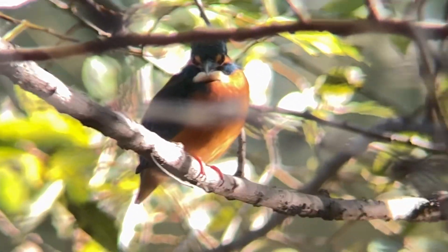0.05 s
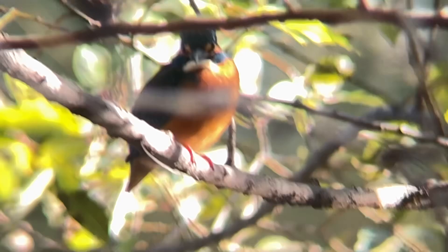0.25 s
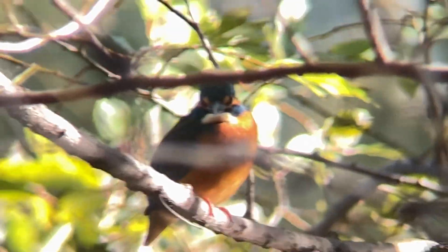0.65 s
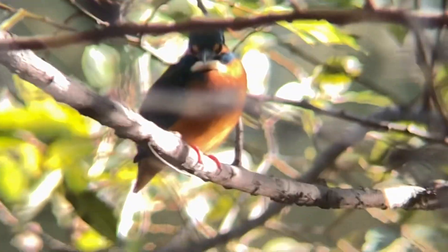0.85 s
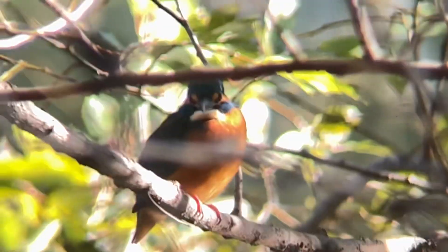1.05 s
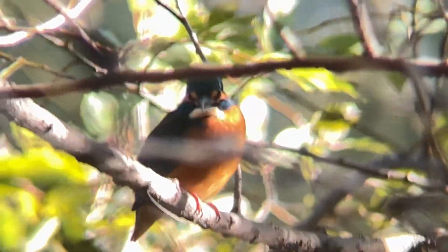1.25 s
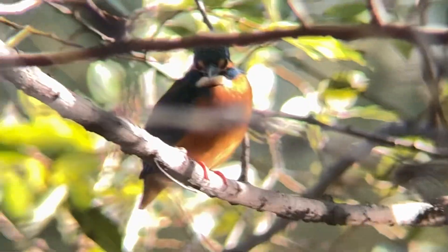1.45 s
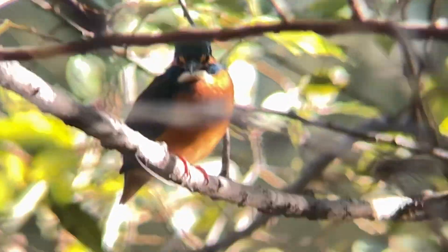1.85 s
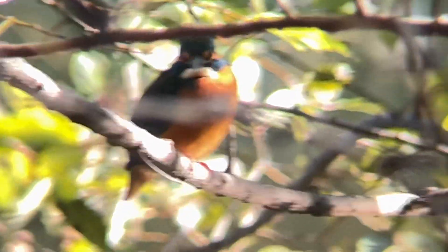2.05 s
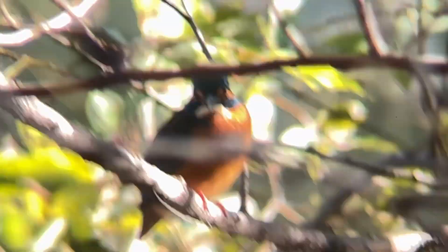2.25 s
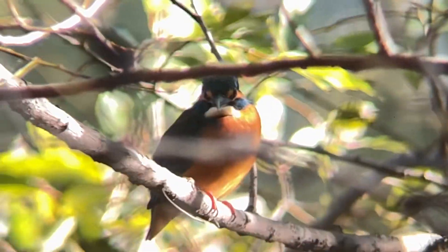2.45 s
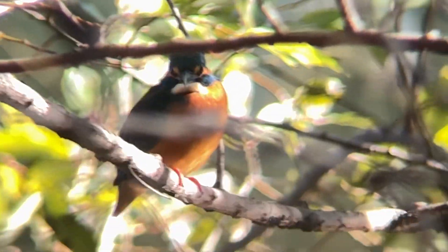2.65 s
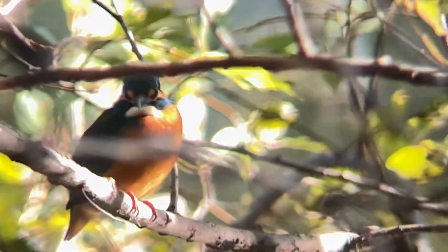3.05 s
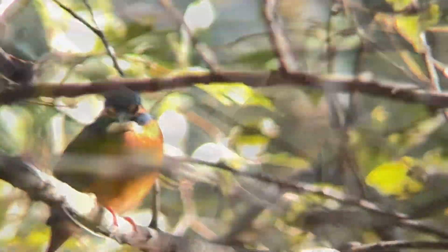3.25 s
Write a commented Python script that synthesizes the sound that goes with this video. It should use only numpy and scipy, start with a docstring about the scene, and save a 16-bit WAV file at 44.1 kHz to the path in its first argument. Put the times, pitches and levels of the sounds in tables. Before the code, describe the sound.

Short, high bird chirps echo lightly through trees over a faint park rumble.

```python
"""A small bird chirps among trees: each note whips up, climbs and drops away, some with a second voice.
Its syrinx sings a wavering whistle, edged with rough harmonics and rasp; fainter whistles sit farther off.
Trunks and leaves scatter the notes into a long tail. Close by come a few soft rustles and the sharp tick
of one tiny hard contact. A low park rumble lies beneath it all."""
import sys
import numpy as np
from scipy import signal
from scipy.fft import rfft, irfft
from scipy.io import wavfile
from scipy.ndimage import uniform_filter1d

SR = 44100
rng = np.random.default_rng(int(sys.argv[2]) if len(sys.argv) > 2 else 0)


def persist_wave(psi):
    """Save psi, clipped to +-1, as 16-bit WAV."""
    counts = np.round(np.clip(psi, -1, 1) * 32767).astype(np.int16)
    wavfile.write(sys.argv[1], SR, np.atleast_2d(counts).T)


N = 149940
T = np.arange(N) / SR

# The bird's notes: start/s, whip-up/s, time to the drop/s, knee/Hz, middle/Hz, top/Hz, drop time/s,
# level/dB, swell/dB, then against the whistle: second harmonic/dB, third harmonic/dB, rasp/dB
BIRD_NOTES = [ (0.703, 0.017, 0.091, 3450, 3953, 4280, 0.017, -42, -3.5, -13, -13, -8),
              (1.022, .020, .099, 3450, 4090, 4570, 0.016, -33, 9.5, -23.5, -19, -16.5),
              (1.025, .016, 0.074, 5330, 5970, 6700, .018, -41.5, -19, -25, -23, -8),
              (1.296, .015, .085, 4428, 5440, 6590, 0.009, -29, -1, -19.5, -20.5, -16),
              (1.307, 0.017, 0.089, 3400, 3940, 4570, 0.007, -39, 13.5, -15.5, -22, -33),
              (1.498, .012, 0.082, 4550, 5214, 6330, 0.011, -28, -3, -23, -18, -21),
              (1.69, 0.015, .091, 4110, 4936, 5706, 0.006, -29, 0, -20.5, -10, -16),
              (1.915, .014, 0.11, 4080, 4940, 5510, 0.0074, -31.5, -1, -29.5, -26, -13.5),
              (2.152, .013, .133, 3620, 4450, 4894, .011, -35, 6, -22, -22.5, -15.5),
              (2.406, 0.01, 0.13, 3783, 4565, 4980, 0.025, -37, 1.5, -28, -21, -14),
              (2.696, 0.0099, 0.11, 3822, 4150, 4350, .011, -47.5, -14, -27, -36, -4),
              (2.732, .018, .100, 3400, 3900, 4412, 0.021, -41.5, 8, -18, -22.5, -9),
              (2.994, 0.021, .093, 4120, 4936, 5590, .010, -37.5, -6.5, -14, -14.5, -12)]
# Spectrum of the rasp in the voice: f/Hz, level/dB
RASP_SPECTRUM = [(1200, -11), (1800, -0.5), (2500, -11), (4000, 4), (7000, 0.5), (10000, 0), (13000, -1.5),
                 (15000, 12.5)]
# The throat's filter on the whistle: f/Hz, gain/dB
THROAT_EQ = [(1600, 1), (2500, -6.5), (3500, -0.5), (6000, -0.5)]
# Far notes: start/s, length/s, first pitch/Hz, last pitch/Hz, level/dB, overtones against the whistle/dB
FAR_NOTES = [(0.0, 0.09, 4150, 4064, -54, -17), (.35, 0.09, 4250, 4340, -65, -33),
             (0.442, 0.067, 3614, 3610, -58.5, -8.5), (2.442, 0.057, 3690, 3550, -49.5, -40),
             (2.86, 0.08, 4345, 4140, -46, -13), (3.184, .09, 3504, 3940, -57, -34)]
# Echoes off trunks: delay/s, gain/dB
TRUNK_ECHOES = [(.0042, -12), (.0075, -10.5), (0.0135, -16.5), (0.022, -13.5), (.029, -37)]
# Far echoes lose a little top: f/Hz, gain/dB
TAIL_EQ = [(6000, -0.5), (9000, -3.5), (13000, -1)]
# The microphone's colour: f/Hz, gain/dB
MIC_EQ = [(1000, -4.5), (5500, -2), (6600, -2), (7200, 3), (7800, -5), (8600, -3), (10000, -7), (11300, 0),
          (12300, -15.5), (13300, -9), (14500, -27), (16000, -49)]
# Phase between the microphone's two ports: f/Hz, phase/rad
PORT_PHASE = [(100, 0), (1400, 1.3), (2000, 1.2), (4000, -0.64), (5500, -0.11), (6400, 1.4), (6900, -0.5),
              (7500, -3.5), (8200, -2.5), (10700, -6.5), (12700, -5.5), (13500, -8), (14500, -10),
              (16000, -34)]
# Ringing modes of the tick: f/Hz, level/dB, t60/s
TICK_RING = [(920, -40, .008), (3150, -27, .004), (4760, -17, .0025), (8100, -19, .002), (9950, -8, .0026),
             (11400, -13, .002), (13600, -4, .0013), (15000, -3, .0016)]
# The tick is too small to radiate lows: f/Hz, gain/dB
TICK_EQ = [(150, -16), (900, -5), (2200, -12), (3100, -3), (6500, -4), (8000, -3), (10000, 1), (15000, 2),
           (16500, -10)]
# Rustle cues: t/s, decay/s, level/dB
RUSTLE_CUES = [(0.095, 0.038, -51.5), (.86, 0.025, -60), (2.675, 0.0075, -51.5), (2.925, 0.0075, -49.5),
               (3.262, 0.0063, -65)]
# Spectrum of a rustle: f/Hz, level/dB
RUSTLE_SPECTRUM = [(500, -3), (1200, -6), (1650, 2.5), (2300, -20), (4000, -5), (6200, -6.5), (8000, -20.5),
                   (11000, -10), (14000, -37)]
# Spectrum of the park bed: f/Hz, level/dB
PARK_SPECTRUM = [(18, -36), (27, -28), (38, -10), (50, -2.5), (61, 1.5), (75, -2), (100, -6.5), (140, -9),
                 (250, -17), (420, -28.5), (700, -30.5), (960, -34), (1150, -37.5), (1700, -35.5),
                 (2500, -41.5), (3500, -35.5), (4300, -32), (5200, -39.5), (6900, -42.5), (7700, -86),
                 (8700, -56.5), (11000, -53.5), (14500, -60), (16000, -86)]
# Stereo width of the bed: f/Hz, side against mid/dB
PARK_WIDTH = [(30, -44), (80, -27), (170, -13.5), (350, -6), (700, -0.5), (1400, -2.5), (3000, -27.5),
              (5000, -38), (9000, -3.5)]


def chirps():
    """Each note whips up to a knee, climbs, rounds over and drops; returns whistle and rasping overtones."""
    start_hz, floor_hz = 1530, 1202  # where the whip starts and the drop levels out
    turn_s, turn_sag = .013, .0507  # the pitch rounds over just before the drop
    whip_db, arch_db, drop_db = -19, 4.5, -14  # at the onset, mid-climb, per drop time
    edge_db, edge_s = 11, .0093  # the voice is harsher as a note starts and breaks off
    out, rasp = np.zeros((2, N)), noise(RASP_SPECTRUM)
    for note in BIRD_NOTES:
        start, whip, length, knee_hz, mid_hz, top_hz, drop, db, swell_db, second_db, third_db, rasp_db = note
        t, crest = T - start, length - turn_s
        stages = [0, whip, crest, length]
        climb = np.clip((t - whip) / (crest - whip), 0, 1)
        bow = 1 - (2 * climb - 1) ** 2
        fallen = np.clip((t - length) / drop, 0, 20)  # drop times elapsed

        hz = np.interp(t, stages, [start_hz, knee_hz, top_hz, top_hz * (1 - turn_sag)])
        hz += bow * (mid_hz - (knee_hz + top_hz) / 2)
        hz = floor_hz + (hz - floor_hz) * np.exp(-1.4 * fallen)
        hz = uniform_filter1d(hz, size=200) * (1 + .003 * bow * wander(90))  # soft corners, tiny kinks

        shape_db = np.interp(t, stages, [whip_db, -swell_db / 2, swell_db / 2, swell_db / 2])
        shape_db += arch_db * (bow - 1) + drop_db * fallen
        gate = np.clip(t / whip * 4, 0, 1) * np.clip((2 - fallen) * 2, 0, 1)

        from_edge = np.maximum(np.minimum(t - whip / 2, length - t), 0)
        harsh_db = edge_db * np.exp(-from_edge / edge_s)
        tone, overtones = syrinx(hz, [second_db + harsh_db, third_db + harsh_db, third_db - 6 + harsh_db])
        overtones += undb(rasp_db + harsh_db / 2) * rasp
        out += gate * undb(db + shape_db) * np.array([tone, overtones])
    return out


def syrinx(hz, overtones_db):
    """The bird's voice: an unsteady whistle and, apart, its rough harmonics from the second upwards."""
    waver, rough_rad, flutter_db = .008, .4, 3.5
    hz = hz * (1 + waver * wander(450))
    phase = 2 * np.pi * np.cumsum(hz) / SR
    rough_phase = phase + rough_rad * wander(1600)
    overtones = sum(undb(db) * np.sin(k * rough_phase) * (k * hz < SR / 2)
                    for k, db in enumerate(overtones_db, 2))
    return np.sqrt(2) * np.array([np.sin(phase), overtones]) * undb(flutter_db * wander(450))


def far_whistles():
    """Soft, nearly level notes from deeper in the trees."""
    out = np.zeros(N)
    for start, length, first_hz, last_hz, db, overtone_db in FAR_NOTES:
        progress = np.clip((T - start) / length, 0, 1)
        arch = np.sqrt(np.abs(np.sin(np.pi * progress)))
        tone, overtones = syrinx(first_hz + (last_hz - first_hz) * progress, [overtone_db, overtone_db])
        out += undb(db) * arch * (tone + overtones)
    return out


def trees(x, direct_db):
    """Woodland reverb: direct sound, echoes off trunks, dense scatter from leaves and a long, duller tail."""
    def scatter(t60):
        wash = rng.standard_normal((2, N)) * undb(-60 * T / t60) * (1 - np.exp(-T / .0071))
        return wash / np.sqrt(np.sum(wash ** 2, axis=1, keepdims=True))
    leaves_db, tail_db, width = -5, -10.5, .04
    mid, side = undb(leaves_db) * scatter(t60=.27) + undb(tail_db) * colour(scatter(t60=1), TAIL_EQ)
    mid[0] += undb(direct_db)
    for delay, db in TRUNK_ECHOES:
        mid[int(delay * SR)] += undb(db)
    return np.array([signal.fftconvolve(x, response)[:N] for response in stereo(mid, width * side)])


def mic_ports(x):
    """The microphone colours the treble, and its two ports turn left and right apart in phase."""
    turn = np.exp(stereo(0, .5j * curve(PORT_PHASE)))
    return irfft(rfft(colour(x, MIC_EQ)) * turn, N)


def tick():
    """A tiny hard contact rings briefly and reaches the left port just before the right."""
    start_s, attack_s, lag_s, gain_db = 3.0946, .00006, .000021, 3.5
    t = np.maximum(T - round(start_s * SR) / SR, 0)
    ring = sum(undb(db - 60 * t / t60) * np.sin(2 * np.pi * hz * t) for hz, db, t60 in TICK_RING)
    left = colour(undb(gain_db) * ring * (1 - np.exp(-t / attack_s)), TICK_EQ)
    lag = np.exp(-2j * np.pi * np.fft.rfftfreq(N, 1 / SR) * lag_s)
    return np.array([left, irfft(rfft(left) * lag, N)])


def rustles():
    """Brief soft scuffs: grainy noise with a quick rise and an exponential fade."""
    attack_s, grain_db = .0068, 4.1
    envelope = sum(undb(db) * np.clip((T - start) / attack_s, 0, 1) * np.exp(-np.maximum(T - start, 0) / decay)
                   for start, decay, db in RUSTLE_CUES)
    grain = undb(grain_db * wander(150))
    return envelope * grain * stereo(noise(RUSTLE_SPECTRUM), .32 * noise(RUSTLE_SPECTRUM))


def park():
    """The bed: distant rumble, centred, under a wider faint hiss, drifting gently in level."""
    level_db, drift_db = -46.5, 1
    mid, side = noise(PARK_SPECTRUM), colour(noise(PARK_SPECTRUM), PARK_WIDTH)
    return undb(level_db + drift_db * wander(5.56)) * stereo(mid, side)


def undb(db):
    """Decibels to gain."""
    return 10 ** (np.asarray(db) / 20)


def unit(x):
    """Scale to rms 1."""
    return x / np.sqrt(np.mean(x ** 2))


def stereo(mid, side):
    """Mid and side to left and right."""
    return np.array([mid + side, mid - side])


def curve(points):
    """A table over log frequency, read at every spectral bin."""
    hz, value = np.array(points, float).T
    return np.interp(np.log(np.fft.rfftfreq(N, 1 / SR) + 1), np.log(hz), value)


def colour(x, points):
    """EQ by a table of f/Hz, gain/dB."""
    return irfft(rfft(x) * undb(curve(points)), N)


def noise(points):
    """Coloured noise of rms 1."""
    return unit(colour(rng.standard_normal(N), points))


def wander(rate):
    """Smooth random modulation of rms 1, through `rate` new values a second."""
    zigzag = np.interp(T * rate, np.arange(N), rng.standard_normal(N))
    return unit(uniform_filter1d(zigzag, max(int(SR / rate / 2), 1)))


def scene():
    """The mix: birdsong through the trees, small noises up close and the park beneath."""
    tone, overtones = chirps()
    near = trees(colour(tone, THROAT_EQ), direct_db=-2.5) + trees(undb(2.5) * overtones, direct_db=0)
    far = trees(far_whistles(), direct_db=-8)
    return mic_ports(near + far) + rustles() + tick() + park()


def record(dry):
    """A steep low-pass takes off the very top."""
    top_hz = 16500
    return signal.sosfilt(signal.ellip(10, .2, 80, top_hz, fs=SR, output="sos"), dry)


dry = scene()
out = record(dry)
persist_wave(out)
```